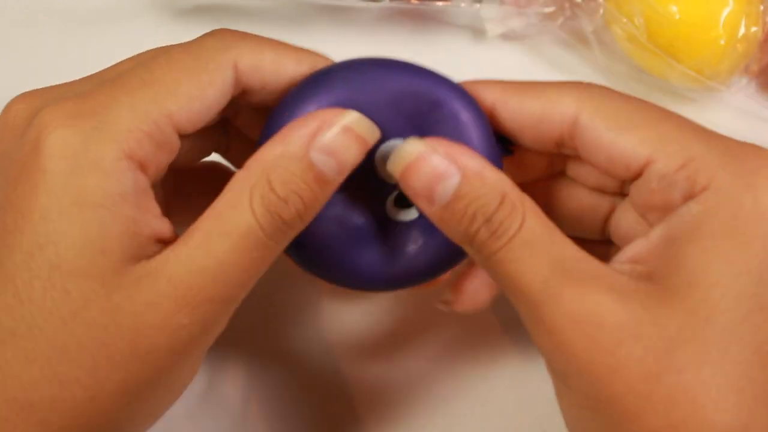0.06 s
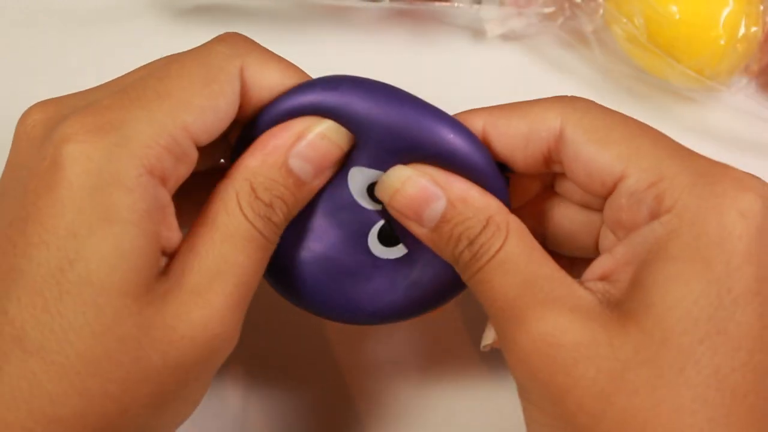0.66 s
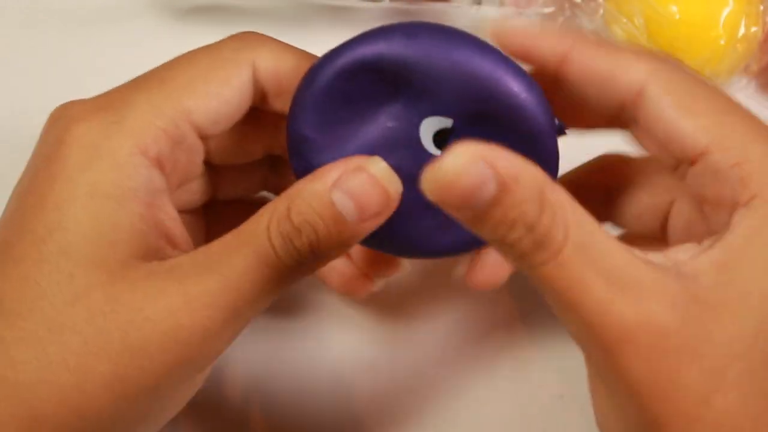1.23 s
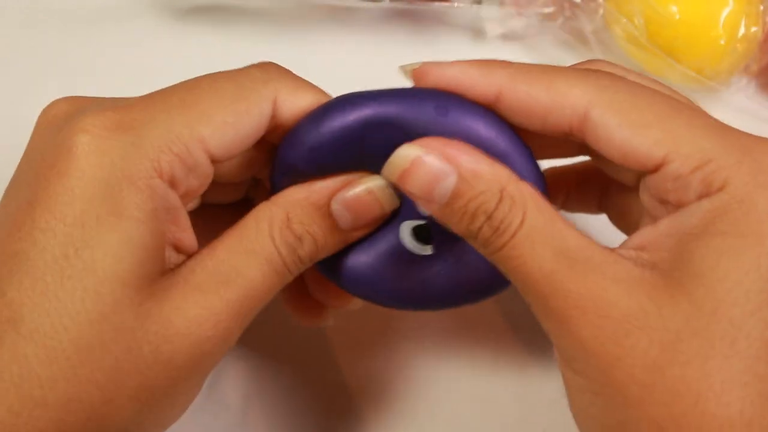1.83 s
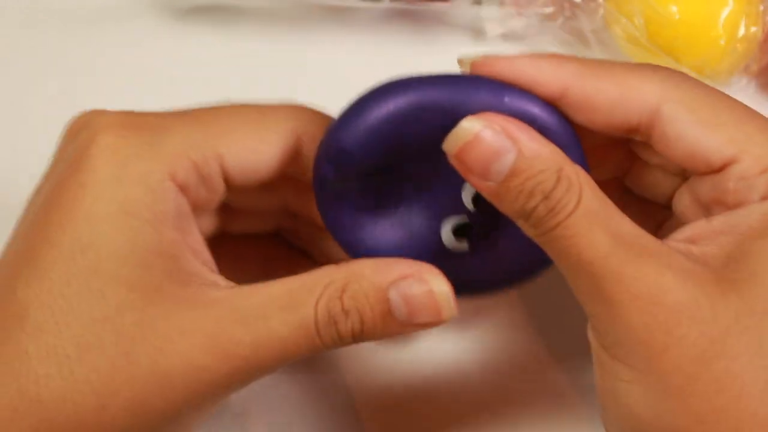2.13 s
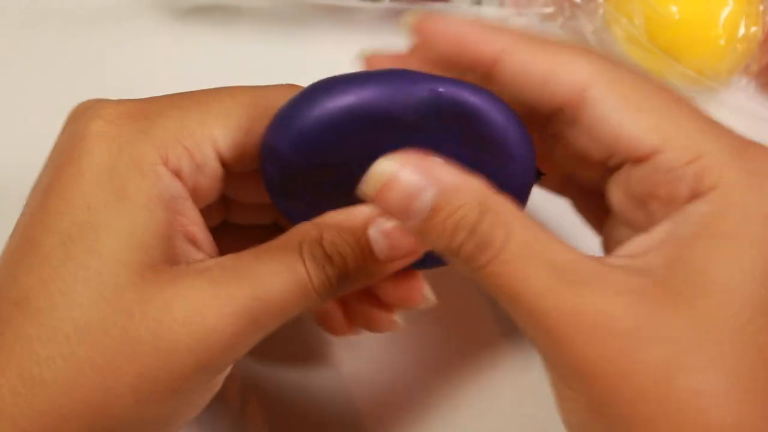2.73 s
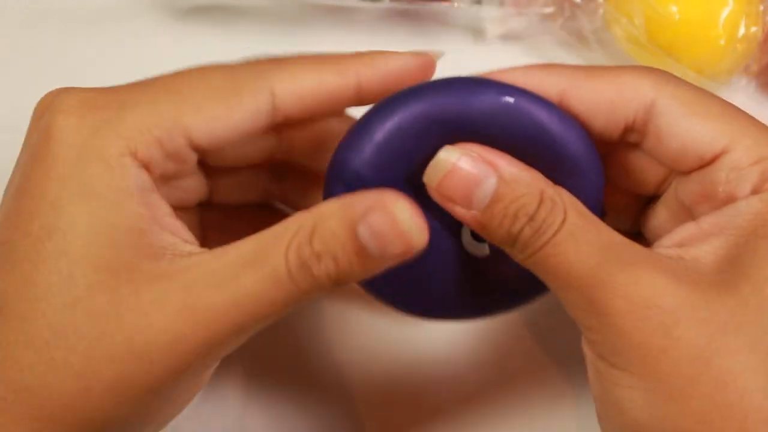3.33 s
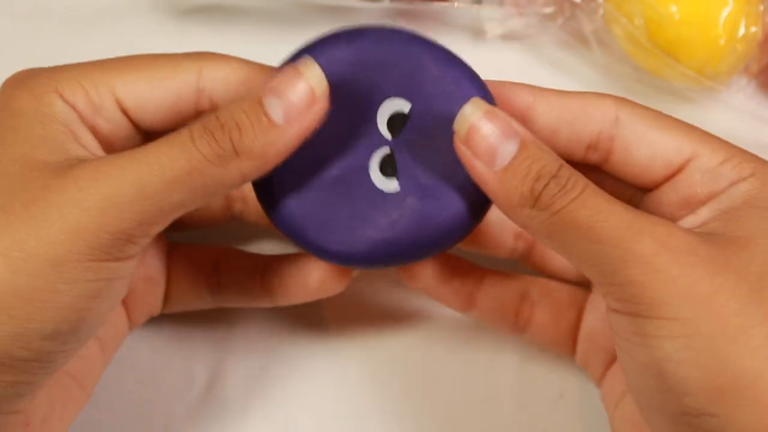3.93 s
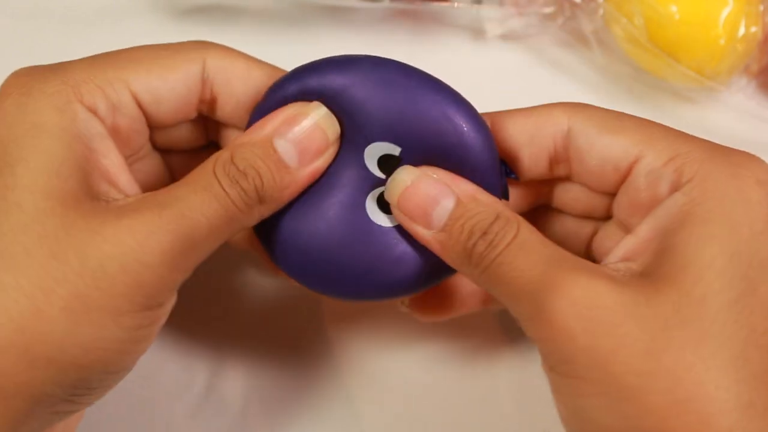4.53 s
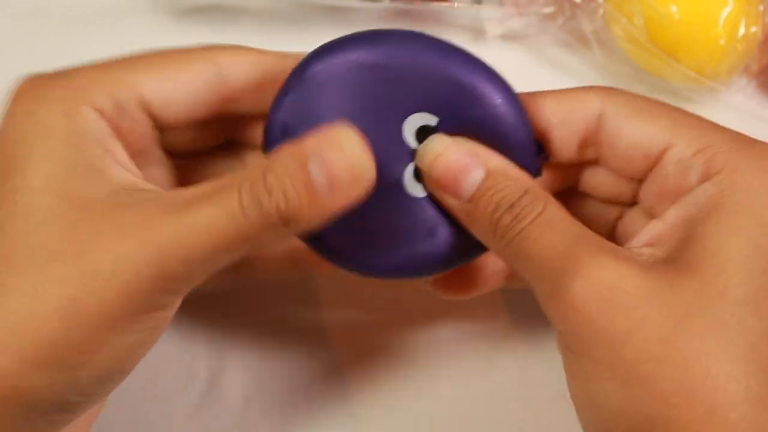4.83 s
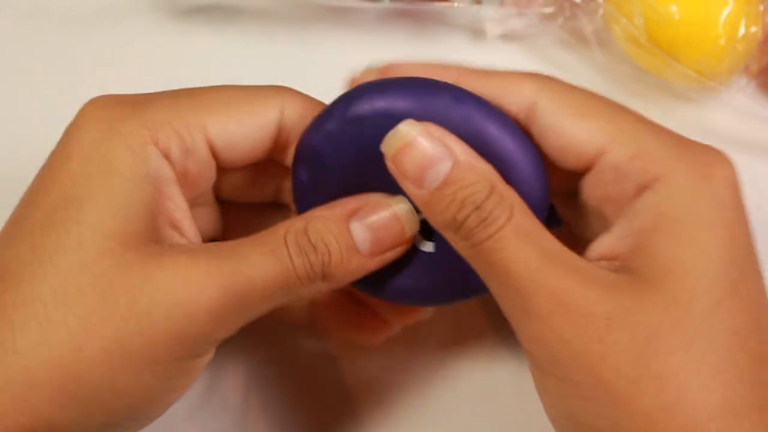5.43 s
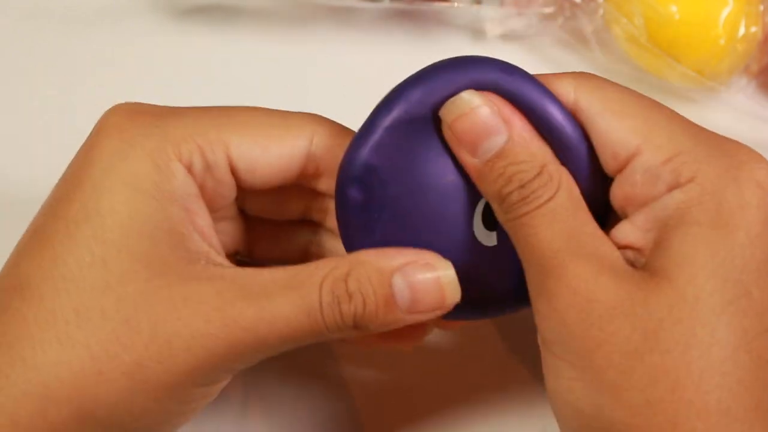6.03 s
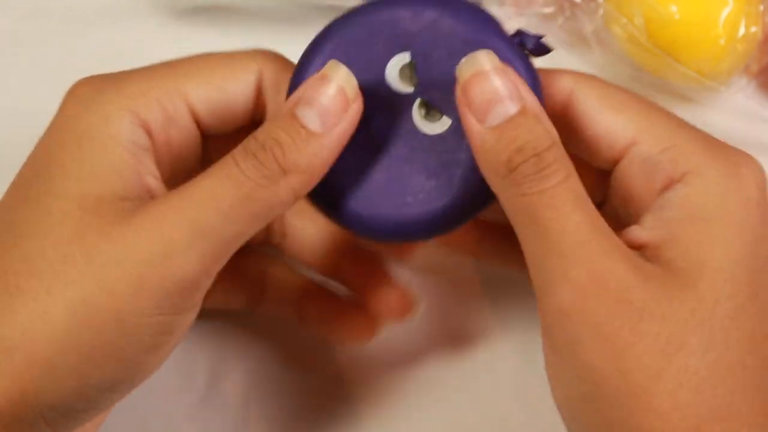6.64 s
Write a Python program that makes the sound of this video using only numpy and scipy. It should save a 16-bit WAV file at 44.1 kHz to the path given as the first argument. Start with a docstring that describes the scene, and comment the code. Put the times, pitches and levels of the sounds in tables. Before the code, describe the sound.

Over a steady low hum and light hiss in a small room, fingers squeeze a rubber toy filled with flour, heard up close. Faint sticky clicks and soft taps come at uneven intervals as skin lets go of the rubber. A tiny squeak follows, then grainy swishes of skin sliding. Two louder clusters of snaps, pops and short squeaks arrive late, and a few soft rubs finish.

```python
"""Two hands knead a flour-filled rubber toy close to a microphone in a small, quiet room.
From the start, mains and a motor hum low under the microphone's hiss. A finger slides, then small
hollows pop open. From about 1 s on, fingers lift: tacky skin peels off with a swelling crackle, lets go
in a snap, and the toy rebounds. The taut rubber squeaks near 2 s, and strokes gather around 4 s. The
loudest peels come with pops and squeaks near 5 s and 6 s; sliding fingers end the scene."""
import sys
import numpy as np
from scipy import signal
from scipy.fft import rfft, irfft, next_fast_len
from scipy.io import wavfile

SR = 44100
rng = np.random.default_rng(int(sys.argv[2]) if len(sys.argv) > 2 else 0)


def wrap_up_sound(samples):
    """Save the sound to the file named by the first command line argument, as 16-bit audio."""
    columns = np.atleast_2d(samples).T
    # keep every value between -1 and 1, then stretch to whole-number steps
    tamed = np.clip(columns, -1, 1)
    steps = np.round(tamed * 32767).astype(np.int16)
    wavfile.write(sys.argv[1], SR, steps)


N = 294147

# fingers peeling off the rubber: (let-go time [s], steady peeling before it [s], crackle level [dB],
# airy treble [dB], closing snap level [dB], gap resonance [Hz])
PEELS = [(0.9487, 0.0048, -32.5, 2.5, -31, 4630), (1.2817, .016, -35, 4.5, -25, 2750),
         (2.063, .01, -32, 2.5, -29, 2370), (2.306, .008, -48.5, 5, -46, 4800),
         (2.6552, 0.034, -43.5, 1, -33, 3160), (3.141, 0.033, -47, -7, -30, 4530),
         (3.1763, 0.024, -45.5, -7, -36.5, 2585), (3.3299, 0, -41.5, 4.5, -38.5, 4130),
         (3.3595, .003, -45.5, 4, -41.5, 5270), (3.659, 0.0036, -34, 5, -25.5, 2530),
         (3.851, .001, -37.5, -0.5, -30.5, 2630), (4.246, 0, -47, 3, -51, 5070),
         (4.920, .003, -35.5, -7.5, -31, 4060), (4.9615, 0.015, -29, -7, -19, 2700),
         (5.2419, .024, -42, 0.5, -29, 4440), (5.3879, 0, -37, -4.5, -27.5, 2420),
         (5.8681, 0.0027, -38.5, -4, -24, 2670), (5.912, 0, -37, -26.5, -22, 2920),
         (6.046, .006, -46, 1, -49, 4800), (6.299, .002, -26, -6, -16, 2500)]
# spectrum of friction noise: (frequency [Hz], level [dB])
FRICTION_SPECTRUM = [(100, 0), (400, -8), (1000, -1), (1500, -2), (2700, 3), (4000, -2.5), (5500, -4),
                     (8000, -13), (16000, -27)]
USUAL_GAP_HZ = 2900  # resonance of the gap between finger and rubber


def undb(db):
    """Convert decibels to an amplitude ratio."""
    return 10 ** (np.asarray(db) / 20)


def unit(x):
    """Normalise to rms 1."""
    return x / np.sqrt(np.mean(x ** 2))


def colour(x, spectrum):
    """Minimum-phase filter, built from the cepstrum of a (frequency [Hz], level [dB]) curve."""
    size = 2 * next_fast_len(len(x))
    hz, db = np.transpose(spectrum)
    bin_db = np.interp(np.log(np.fft.rfftfreq(size, 1 / SR) + 1e-6), np.log(hz), db)
    cepstrum = irfft(np.log(undb(bin_db)))
    cepstrum[1:size // 2] *= 2
    cepstrum[size // 2 + 1:] = 0
    return irfft(rfft(x, size) * np.exp(rfft(cepstrum)))[:len(x)]


def whiten(x):
    """Flatten the magnitude spectrum and keep the phase."""
    return irfft(np.exp(1j * np.angle(rfft(x))), len(x))


def clock(length_s):
    """Sample times of an interval."""
    return np.arange(int(length_s * SR)) / SR


def add(track, start_s, sound):
    """Superpose a sound on the track."""
    i = int(start_s * SR)
    track[i:i + len(sound)] += sound[:max(N - i, 0)]


def grains(count, per_second, spread_db):
    """Shot noise: independent impulses of random size and sign."""
    size, chance, polarity = rng.random((count, 3)).T
    amplitude = undb(spread_db * np.minimum(-np.log(size + 1e-9), 3))
    return (chance < per_second / SR) * np.sign(polarity - .5) * amplitude


def gap_resonance(x, hz, q, boost_db):
    """Cavity resonance: the gap between finger and rubber reinforces a band around its own pitch."""
    return x + undb(boost_db) * signal.lfilter(*signal.iirpeak(hz, q, fs=SR), x)


def background(rumble_db=-52.5, hiss_db=-59):
    """Neighbouring tones of mains and a motor beat over building rumble and steady broadband hiss."""
    # hum tones: (frequency [Hz], rms level [dB])
    hum_lines = [(17.9, -54.5), (51.85, -48), (58.2, -58.5), (100, -66.5), (120.3, -64.5), (155.5, -66.5),
                 (207.3, -76), (234, -76)]
    # spectra of the hiss, its stereo side against its mid, and the rumble: (frequency [Hz], level [dB])
    hiss_spectrum = [(110, -29), (180, -6), (238, -5), (315, -5), (551, -12), (729, -7), (800, -12.5),
                     (982, -11), (1350, -14), (1590, -13), (1720, -16.5), (6450, -18.5), (15500, -21)]
    side_spectrum = [(60, 13), (250, -13), (1000, -8.5), (4000, -4), (12000, -2)]
    rumble_spectrum = [(8, -3), (20, 0), (32, -7), (65, 2.5), (80, -1.5), (95, -11), (135, -14.5),
                       (175, -11), (220, -44), (400, -46.5)]
    t = np.arange(N) / SR
    hum = sum(np.sqrt(2) * undb(db) * np.sin(2 * np.pi * (hz * t + rng.random())) for hz, db in hum_lines)
    rumble = unit(colour(rng.standard_normal(N), rumble_spectrum)) * undb(rumble_db)
    mid, side = (unit(colour(rng.standard_normal(N), hiss_spectrum)) * undb(hiss_db) for _ in range(2))
    return hum + rumble + mid + colour(side, side_spectrum) * np.array([[1], [-1]])


def flour(level_db=-73):
    """Granular friction: the packed filling shifts with a faint rustle that comes and goes."""
    drift = unit(colour(rng.standard_normal(N), [(5, 0), (25, -80)]))
    rustle = colour(grains(N, per_second=980, spread_db=5), FRICTION_SPECTRUM)
    return unit(rustle * undb(4 * drift)) * undb(level_db)


def ticks(count=22, level_db=-55, scatter_db=4, scatter_octaves=.76):
    """Creep: the grip gives way in faint snaps at random times."""
    out = np.zeros(N)
    for when, size, pitch in rng.random((count, 3)):
        gap_hz = USUAL_GAP_HZ * 2 ** (scatter_octaves * (2 * pitch - 1))
        add(out, when * N / SR, snap(level_db + scatter_db * (2 * size - 1), gap_hz, treble_db=-5))
    return out


def rubs(rise_share=.33, rise_db=10, fall_db=15):
    """Sliding friction of skin on rubber: a grainy swish; the duller the stroke, the more body it has."""
    # finger strokes: (peak time [s], duration [s], relative level [dB], treble [dB])
    strokes = [(0.088, 0.022, -51, -7), (2.992, 0.103, -58.5, 8), (3.623, .05, -47.5, 0),
               (3.775, .05, -46.5, -1), (3.913, 0.051, -51.5, -4), (3.976, .1, -42.5, -2.5),
               (4.028, .06, -43.5, 2), (4.221, .035, -47, -1.5), (4.491, .026, -49.5, -1),
               (4.664, .04, -55.5, -8), (5.197, 0.034, -50, -5), (5.897, .04, -39.5, 3),
               (6.074, 0.062, -50, -9), (6.429, 0.064, -45, 7), (6.509, 0.051, -42.5, -0.5),
               (6.557, .08, -50, 0), (6.612, 0.099, -44.5, 3)]
    out = np.zeros(N)
    for peak, length, db, treble_db in strokes:
        t, rise = clock(length), rise_share * length
        swell_db = -rise_db * np.maximum(1 - t / rise, 0) ** 2
        fade_db = -fall_db * np.maximum(t - rise, 0) / (length - rise)
        envelope = undb(swell_db + fade_db) * signal.windows.tukey(len(t), .15)
        friction = colour(grains(len(t), per_second=1200, spread_db=2), FRICTION_SPECTRUM)
        swish = colour(friction, [(1000, -.6 * treble_db), (2500, 0), (5000, treble_db)])
        add(out, peak - rise, unit(swish) * envelope * undb(db - 4.5))
    return out


def bumps(t60_cycles=10.6, rebound_hz=88, rebound_db=-9, rebound_t60_s=.062):
    """Damped oscillation: the flour stills the toy within a few cycles of each knock or rebound."""
    # soft finger knocks: (time [s], frequency [Hz], relative level [dB])
    knocks = [(.7045, 903, -40), (.71, 303, -48), (1.9539, 900, -34), (1.956, 240, -47),
              (2.656, 165, -47.5), (5.868, 198.7, -47), (6.411, 300, -39)]
    out, t = np.zeros(N), clock(.15)
    for start, hz, db in knocks:
        add(out, start, np.sin(2 * np.pi * hz * t) * undb(db + 3.5 - 60 * t * hz / t60_cycles))
    for (let_go, _, crackle_db, *_), detune in zip(PEELS, rng.standard_normal(len(PEELS))):
        rebound = np.sin(2 * np.pi * rebound_hz * (1 + .1 * detune) * t)
        add(out, let_go, rebound * undb(crackle_db + rebound_db - 60 * t / rebound_t60_s))
    return out


def pops(overshoot=.23, opening_s=.0023, attack_s=.00058):
    """Cavity modes: as a hollow between skin and rubber opens, they fall in pitch and ring briefly."""
    # hollows opening: (time [s], relative level [dB])
    openings = [(.7045, -44), (.7138, -41), (4.9448, -31.5), (4.9635, -28.5), (5.2651, -31.5), (5.391, -30),
                (5.914, -25.5), (6.3015, -22), (6.4101, -39.5)]
    # modes of the hollow: (frequency [Hz], level [dB], time to decay by 60 dB [s])
    modes = [(408, -25, 0.1), (531, -20, 0.14), (730, -0.5, 0.04), (981, 0, 0.069), (1297, -10.5, 0.056),
             (1758, -5.5, 0.045), (2260, -15, 0.03), (2670, -12, 0.028)]
    out, t = np.zeros(N), clock(.08)
    hz, mode_db, t60 = np.transpose(modes)[:, :, None]
    glide = t + overshoot * opening_s * (1 - np.exp(-t / opening_s))
    attack = 1 - np.exp(-t / attack_s)
    for start, db in openings:
        detune, phase = rng.standard_normal((2, len(hz), 1))
        tones = np.sin(2 * np.pi * hz * (1 + .016 * detune) * glide + np.pi * phase)
        ring = np.sum(tones * undb(mode_db - 60 * t / t60), axis=0)
        add(out, start - .001, ring * attack * undb(db - 3.5))
    return out


def squeaks(rasp_db=-27):
    """Stick-slip oscillation: taut rubber grips and slips in a rough chirp with a rasp above it."""
    # chirps: (time [s], duration [s], first pitch [Hz], last pitch [Hz], level [dB], roughness [0-1])
    chirps = [(1.9546, .0095, 3820, 4040, -22.3, 0.2), (4.919, 0.0056, 3920, 3480, -26.5, 0.45),
              (4.955, 0.0048, 3294, 2780, -25, 0.69), (5.9067, 0.0083, 2835, 2320, -27.5, 0.53),
              (6.2964, 0.0039, 3140, 2260, -20, 0.42)]
    out = np.zeros(N)
    for start, length, from_hz, to_hz, db, roughness in chirps:
        count = int(length * SR)
        hz = np.linspace(from_hz, to_hz, count) * (1 + roughness * rng.standard_normal(count))
        rasp = unit(colour(rng.standard_normal(count), [(3500, -61), (6000, 11), (8000, -35), (10000, 0)]))
        tone = np.sin(2 * np.pi * np.cumsum(hz) / SR) + undb(rasp_db) * rasp
        add(out, start, unit(tone * signal.windows.tukey(count, .7)) * undb(db))
    return out


def snap(db, gap_hz, treble_db, decay_s=.0027, attack_s=.0002, span_s=.0021):
    """Impulsive excitation: a few milliseconds of tearing drive the gap and the damped rubber."""
    # spectrum of the tear: (frequency [Hz], level [dB])
    tear_spectrum = [(60, 14), (200, -19), (450, -5), (900, 2), (1500, -4.5), (2700, 1), (5000, -7.5),
                     (7000, -6.5), (9500, -15.5), (16000, -26)]
    t = clock(.021)
    envelope = np.exp(-t / decay_s) * (1 - np.exp(-t / attack_s))
    tear = whiten(rng.standard_normal(len(t)) * envelope) * np.sqrt(envelope)
    bright_db = treble_db + 7.5 * np.log2(gap_hz / USUAL_GAP_HZ)  # a narrower gap is higher and brighter
    tilt = [(3000, 0), (5000, bright_db), (7500, bright_db), (10000, min(bright_db, .35 * bright_db))]
    sound = gap_resonance(colour(colour(tear, tear_spectrum), tilt), gap_hz, q=9, boost_db=7)
    return sound * np.sqrt(span_s * SR / np.sum(sound ** 2)) * undb(db - 2.5)


def snaps(straggler_db=-8.5, linger_s=.024, scatter_db=3, scatter_octaves=.23):
    """Adhesive failure: each peel ends in a snap with two stragglers near it; single snaps join them."""
    # distinct snaps during, just after or between peels, and sharp echoes just after loud pops:
    # (time [s], relative level [dB], gap resonance [Hz])
    single_snaps = [(0.6571, -43.5, 2776), (.9617, -36.5, 2660), (1.237, -45, 2330), (1.3245, -38.5, 4450),
                    (1.3414, -40.5, 4030), (1.9533, -26, 2520), (1.9555, -24, 7100), (2.08, -38, 3130),
                    (2.6318, -37, 4680), (2.6427, -34.5, 2540), (2.9596, -43.5, 7100), (3.163, -33, 2540),
                    (3.2521, -46, 2640), (3.8525, -34, 5460), (4.9525, -21, 3030), (4.963, -22, 5500),
                    (5.262, -28, 4370), (5.281, -32.5, 2460), (6.315, -26, 2600), (6.413, -35, 2530)]
    out = np.zeros(N)
    for let_go, hold, crackle_db, air_db, snap_db, gap_hz in PEELS:
        add(out, let_go, snap(snap_db, gap_hz, treble_db=3 + .45 * air_db))
        for when, size, pitch in rng.random((2, 3)):
            db = crackle_db + straggler_db + scatter_db * (2 * size - 1)
            hz = gap_hz * 2 ** (scatter_octaves * (2 * pitch - 1))
            add(out, let_go - hold + when * (hold + linger_s), snap(db, hz, air_db))
    for start, db, gap_hz in single_snaps:
        add(out, start, snap(db, gap_hz, treble_db=.5))
    return out


def peel_swell(t, hold, air_db, fall_db_per_s=1100):
    """Exponential growth, a plateau, then exponential decay from the let-go at t = 0."""
    rise_db_per_s = 1600 * undb(.46 * air_db)  # an airy peel is a quick one and swells faster
    return undb(-rise_db_per_s * np.maximum(-t - hold, 0) - fall_db_per_s * np.maximum(t, 0))


def peels(before_s=.04, after_s=.059, hiss_hz=7050, hiss_db=1, hiss_lead_s=.003):
    """Crack propagation: the edge of the contact runs across the skin, breaking tiny sticky bonds."""
    # spectrum of the breaking bonds: (frequency [Hz], level [dB])
    bond_spectrum = [(80, 3.5), (300, -6.5), (900, -4.5), (1500, -2), (2700, 1.5), (4500, 0), (7000, -2),
                     (10000, -5), (16000, -10.5)]
    highpass = signal.butter(2, hiss_hz, "high", fs=SR, output="sos")
    out = np.zeros(N)
    for let_go, hold, db, air_db, _, gap_hz in PEELS:
        t = clock(before_s + hold + after_s) - before_s - hold
        bonds = colour(grains(len(t), per_second=7000, spread_db=3.8), bond_spectrum)
        airy = colour(bonds, [(3000, 0), (9000, air_db)])
        crackle = unit(gap_resonance(airy, gap_hz, q=17, boost_db=2.5))
        hiss = signal.sosfiltfilt(highpass, crackle)
        body = (crackle - hiss) * peel_swell(t, hold, air_db)
        # the finest bonds break first, so the hiss runs ahead
        early_hiss = undb(hiss_db) * hiss * peel_swell(t + hiss_lead_s, hold, air_db)
        add(out, let_go + t[0], (body + early_hiss) * undb(db - 4.5))
    return out


def room(x, t60_s=.23, wet_db=-10.5, side_db=-16, delay_s=.0021, build_s=.00092, echo_db=-24):
    """Reflection: two near surfaces give faint echoes, and the walls a short diffuse reverberation."""
    # spectrum of the reverberation: (frequency [Hz], level [dB])
    wall_spectrum = [(100, -5), (400, 6.5), (1000, -.5), (1700, 4), (2700, -1.5), (4000, -2.5), (6500, 1),
                     (10000, -1), (16000, -16)]
    t = clock(.35)
    fade = undb(-60 * t / t60_s) * (1 - np.exp(-np.maximum(t - delay_s, 0) / build_s))
    fade /= np.sqrt(np.sum(fade ** 2))
    tails = [colour(rng.standard_normal(len(t)) * fade, wall_spectrum) for _ in range(2)]
    mid, side = (signal.fftconvolve(x, tail)[:N] for tail in tails)
    near = x.copy()
    for lag_s in (.0162, .0305):
        add(near, lag_s, x * undb(echo_db))
    return near + undb(wet_db) * (mid + undb(side_db) * side * np.array([[1], [-1]]))


def scene():
    """Superposition: the toy, straight in front of the microphone, sounds in the room over the hum."""
    toy = peels() + snaps() + ticks() + pops() + squeaks() + rubs() + bumps() + flour()
    return room(toy) + background()


def record(dry, cutoff_hz=15900):
    """Band limiting: a steep low-pass filter removes the highest treble."""
    return signal.sosfilt(signal.ellip(10, .2, 80, cutoff_hz, fs=SR, output="sos"), dry)


dry = scene()
out = record(dry)
wrap_up_sound(out)
```